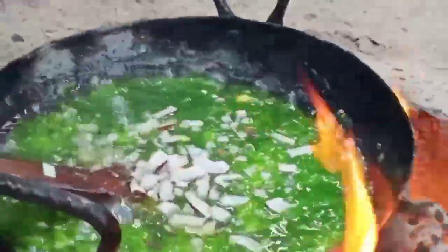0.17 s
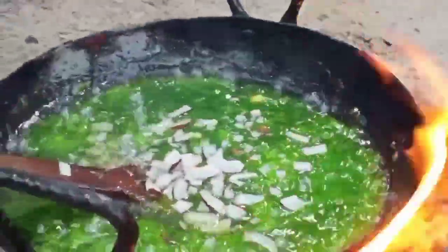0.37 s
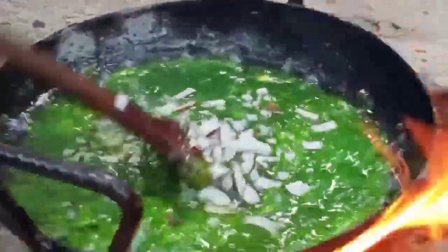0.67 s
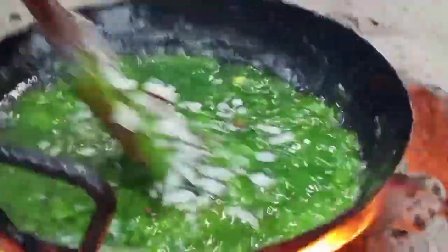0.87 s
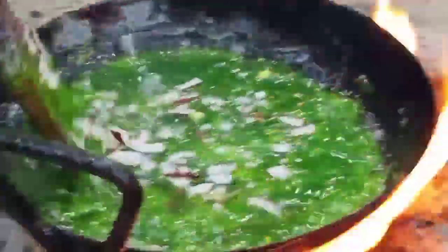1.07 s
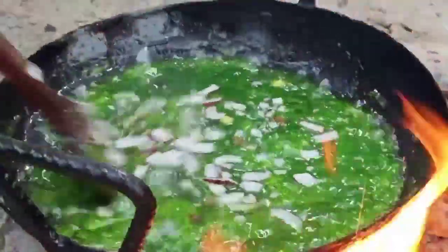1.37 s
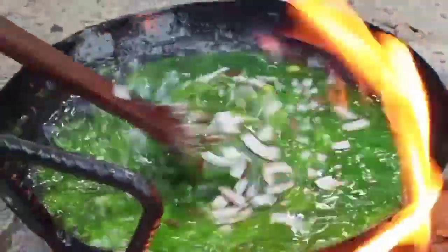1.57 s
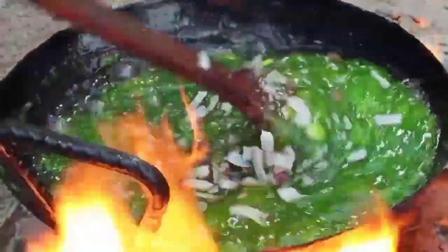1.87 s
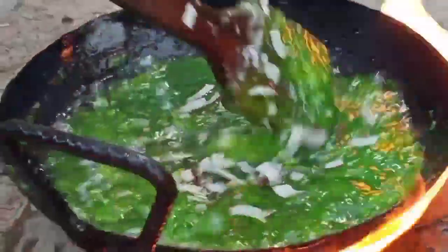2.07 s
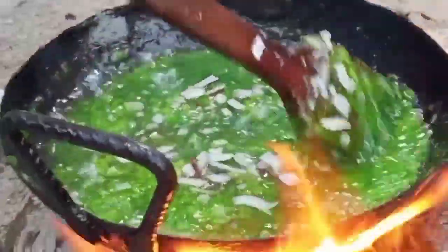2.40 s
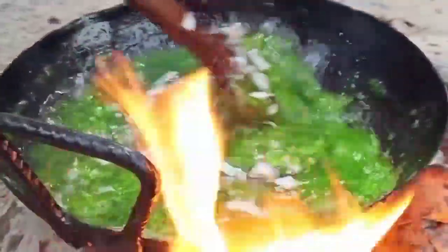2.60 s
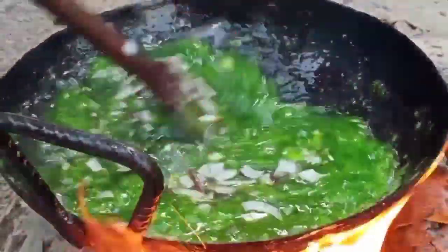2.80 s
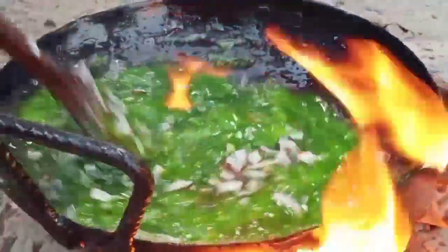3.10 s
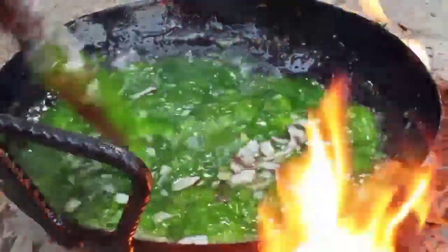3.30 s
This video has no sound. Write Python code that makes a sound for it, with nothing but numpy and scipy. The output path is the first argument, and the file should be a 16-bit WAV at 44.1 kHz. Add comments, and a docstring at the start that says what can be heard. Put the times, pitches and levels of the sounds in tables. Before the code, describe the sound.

Thick mixture sizzles and pops in an iron pan over a fluttering wood fire while a spatula scrapes

```python
"""A thick sweet mixture fries in an iron pan over an open wood fire, heard from close by outdoors.
From the start flames roar and flutter (shaped noise and grains) under a simmer of dense ticks that surges.
Bubbles soon pop as short upward chirps; from 0.8 s a wooden spatula scrapes, and droplets spit noise bursts.
Steam hisses at 1.5 s as the mass is turned; from 2.2 s a small distant bird whistles rising, echoing sines.
The fire's roar slowly grows throughout, while the simmer sinks near the end."""
import sys
import numpy as np
from scipy import signal
from scipy.fft import rfft, irfft
from scipy.io import wavfile
from scipy.ndimage import uniform_filter1d

SR = 44100
rng = np.random.default_rng(int(sys.argv[2]) if len(sys.argv) > 2 else 0)


def output_pcm(signal):
    """Save a mono or channel-first signal as 16-bit PCM at the path in sys.argv[1].

    Samples are clipped to [-1, 1] before scaling.
    """
    pcm = np.clip(np.atleast_2d(signal).T, -1, 1) * 32767
    wavfile.write(sys.argv[1], SR, np.round(pcm).astype(np.int16))


N = 152145


def undb(db):
    """Decibels to gain."""
    return 10 ** (np.asarray(db) / 20)


def unit(x):
    """Scale to rms 1."""
    return x / np.sqrt(np.mean(x ** 2))


def noise(count=N):
    """White noise of rms near 1."""
    return rng.standard_normal(count)


def band(x, low_hz, high_hz):
    """Band-pass between two corner frequencies."""
    return signal.sosfilt(signal.butter(2, [low_hz, high_hz], "band", fs=SR, output="sos"), x)


def whistle(pitch):
    """A sine that follows a pitch in Hz, sample by sample."""
    return np.sin(2 * np.pi * np.cumsum(pitch) / SR)


def curve(rows):
    """Gain along (s, dB) points."""
    return undb(np.interp(np.arange(N) / SR, *np.array(rows).T))


def walk(rate):
    """Smooth, bounded random motion with a spread near 1; rate is new values per second."""
    k = int(SR / rate)
    steps = np.repeat(noise(N // k + 1), k)[:N]
    smooth = uniform_filter1d(uniform_filter1d(steps, k), k)
    return 2 * np.tanh(smooth * np.sqrt(.5))


def colour(x, points):
    """Causal minimum-phase filter through (Hz, dB) points."""
    size = 4096
    hz, db = np.array(points).T
    bins_hz = np.arange(size // 2 + 1) * SR / size
    gain = undb(np.interp(np.log(bins_hz + 1), np.log(hz), db))
    # folding the cepstrum onto positive time makes the filter minimum-phase
    cepstrum = irfft(np.log(gain))
    cepstrum[1:size // 2] *= 2
    cepstrum[size // 2 + 1:] = 0
    return signal.fftconvolve(x, irfft(np.exp(rfft(cepstrum))))[:N]


def add(out, start_s, sound):
    """Mix a short sound in at a time."""
    i = int(start_s * SR)
    if 0 <= i < N:
        out[i:i + len(sound)] += sound[:N - i]


def echoes(x, t60):
    """Diffuse reflections: decaying noise of unit energy that starts after 2 ms."""
    t = np.arange(SR // 3) / SR
    tail = noise(len(t)) * np.exp(-np.log(1000) * t / t60) * (t > .002)
    return signal.fftconvolve(x, tail / np.linalg.norm(tail))[:N]


ATTACK_S, RELEASE_S = 0.0063, 0.0071


def swells(rows):
    """Attack, hold and release for each (s, length s, dB) row, summed in power."""
    t = np.arange(N) / SR
    power = np.zeros(N)
    for s, hold, db in rows:
        attack = np.clip((t - s) / ATTACK_S + .5, 0, 1)
        release = np.exp(-np.maximum(t - s - hold, 0) / RELEASE_S)
        power += (undb(db) * attack * release) ** 2
    return np.sqrt(power)


GRAIN_HZ = 2527  # pitch at which the tick rates hold; higher ticks are more frequent


def crackle(per_s, spread_db, points):
    """Dense ticks of a cycle or two and uneven size, octave by octave, in a given colour; rms 1."""
    out = np.zeros(N)
    for hz in SR / 2.5 / 2 ** np.arange(8):
        hit = rng.random(N) < per_s / SR * max(hz / GRAIN_HZ, .5)
        sizes = undb(spread_db * np.clip(noise(), -2.5, 2.5))
        signs = rng.choice([-1, 1], N)
        out += band(unit(hit * sizes * signs), hz / 2, hz)
    return unit(colour(out, points))


# bird notes, each an upward slur: t/s, rise length/s, start f/Hz, end f/Hz, level/dB before the yard mix
BIRD_NOTES = [(2.201, 0.028, 5200, 6880, -38.5), (2.292, 0.025, 5100, 6560, -39),
              (2.394, 0.031, 4800, 6120, -38.5), (2.499, 0.093, 5170, 6610, -41),
              (2.677, 0.1, 5130, 6710, -42.5), (2.893, 0.077, 5630, 7100, -39),
              (3.095, 0.083, 5630, 6940, -43.5), (3.245, 0.13, 3734, 6710, -44.5)]
BIRD_HOLD_SHARE, BIRD_FADE_S = 0.38, 0.016  # hold after the rise, as a share of the rise time
BIRD_RASP = .04  # pitch spread during the rise, share of the pitch
BIRD_DIRECT_DB, BIRD_ECHO_DB, YARD_T60_S = 0.5, 7, 0.11


def bird():
    """A run of whistles that rise with a rasp and level off cleanly on top, smeared by the yard."""
    out, t = np.zeros(N), np.arange(SR // 5) / SR
    for s, length, from_hz, to_hz, db in BIRD_NOTES:
        rasp = BIRD_RASP * walk(900)[:len(t)] * (t < length)
        pitch = np.interp(t, [0, length], [from_hz, to_hz]) * (1 + rasp)
        time_left = length * (1 + BIRD_HOLD_SHARE) - t
        shape = np.clip(np.minimum(t, time_left) / BIRD_FADE_S, 0, 1)
        add(out, s, undb(db) * shape * whistle(pitch))
    return undb(BIRD_DIRECT_DB) * out + undb(BIRD_ECHO_DB) * echoes(out, YARD_T60_S)


# tone of the low roar: f/Hz, relative level/dB
ROAR_COLOUR = [(30, -17), (65, -18), (90, -5), (125, 0.5), (200, -7.5), (300, -15), (500, -8), (1000, -13),
               (3000, -31.5)]
# tone of the fluttering flames: f/Hz, relative level/dB
FLUTTER_COLOUR = [(60, -43.5), (140, 2), (250, 0.5), (320, -2.5), (390, 1.5), (480, -7.5), (800, -17.5),
                  (2000, -37)]
# flames licking round the pan: t/s, level/dB
FLARE_LEVEL = [(0, -58), (.26, -41), (.6, -42), (1.05, -41), (1.47, -48.5), (1.77, -43.5), (2.1, -53),
               (2.72, -45.5), (3.45, -56)]
ROAR_START_DB, ROAR_RISE_DB_PER_S, ROAR_FLICKER_DB = -47, 0.63, 4
PUFFS_PER_S, PUFF_SPREAD_DB = 240, 3


def fire():
    """A low roar that slowly grows, and the flutter of flames that lick round the pan in uneven puffs."""
    roar_db = ROAR_START_DB + ROAR_RISE_DB_PER_S * np.arange(N) / SR
    roar_db = roar_db + ROAR_FLICKER_DB * walk(44.66)
    roar = unit(colour(noise(), ROAR_COLOUR)) * undb(roar_db)
    flutter = crackle(PUFFS_PER_S, PUFF_SPREAD_DB, FLUTTER_COLOUR) * curve(FLARE_LEVEL)
    return roar + flutter


# the spatula drags over the pan: t/s, length/s, level/dB before flicker
SCRAPE_STROKES = [(.80, 0.024, -36.5), (1.075, 0.032, -35.5), (1.515, 0.19, -29.5), (1.715, 0.16, -33),
                  (1.85, 0.075, -36.5), (1.95, 0.35, -38), (2.46, 0.083, -41), (2.59, 0.246, -42.5),
                  (2.845, 0.053, -33.5), (2.90, 0.24, -40.5), (3.23, 0.52, -46)]
# tone of wood on damped iron: f/Hz, relative level/dB
SCRAPE_COLOUR = [(90, -7), (250, -6.5), (500, 0.5), (900, 3), (1200, -4), (1620, 6.5), (2000, -1),
                 (2400, 3.5), (3200, -3.5), (5000, -7.5), (9000, -11.5)]
# the heavy mass flops back into the pan: t/s, length/s, level/dB
MASS_THUDS = [(.822, 0.017, -33), (1.64, 0.015, -42)]
SCRAPE_PER_S, SCRAPE_SPREAD_DB, SCRAPE_FLICKER_DB = 700, 4.5, 3.5
THUD_HZ = 435  # upper edge of the thud


def spatula():
    """Wood sticks and slips on iron that the mixture damps; the lifted mass lands with a dull thud."""
    grains = crackle(SCRAPE_PER_S, SCRAPE_SPREAD_DB, SCRAPE_COLOUR)
    scrape = grains * swells(SCRAPE_STROKES) * undb(SCRAPE_FLICKER_DB * walk(80))
    dull = band(noise(), THUD_HZ / 4, THUD_HZ)
    return scrape + unit(dull) * swells(MASS_THUDS)


# droplets that spit in the oil: t/s at the peak, level/dB before gain and colour
SPIT_HITS = [(0.9723, -17), (1.199, -20.5), (1.357, -30), (1.957, -28)]
# steam escapes as the spatula turns the mass over: t/s, length/s, level/dB before colour
STEAM_PUFFS = [(1.512, 0.13, -36), (1.728, .05, -34)]
# tone of spits and steam: f/Hz, gain level/dB
SPIT_TONE = [(200, 1), (2000, -9), (5000, 9), (15000, 8)]
SPIT_DECAY_S, SPIT_GAIN_DB = 0.001291, 1.98
TICK_PER_S, TICK_DB, TICK_SPREAD_DB = 30, -42, 3.5  # the finest droplets, before gain and colour


def spits():
    """Droplets flash to steam with a short crack, the finest at random; freed steam hisses in that colour."""
    out = np.zeros(N)
    u = np.arange(SR // 60) / SR / SPIT_DECAY_S
    shape = u * np.exp(1 - u)  # peaks one decay time in
    ticks = [(rng.random() * N / SR, TICK_DB + TICK_SPREAD_DB * rng.standard_normal())
             for _ in range(int(TICK_PER_S * N / SR))]
    for s, db in SPIT_HITS + ticks:
        add(out, s - SPIT_DECAY_S, undb(db + SPIT_GAIN_DB) * noise(len(u)) * shape)
    steam = swells(STEAM_PUFFS) * noise()
    return colour(out + steam, SPIT_TONE)


POP_RISE, POP_FALL, POP_GLIDE = 0.7, 1, 0.1102  # in pop lengths; octaves up per pop length
POP_CRACK_DB = -7.48  # noise before its band-pass, against the chirp


def pop(hz, ms):
    """A bubble opens: a few cycles rising in pitch, roughened by the tearing skin; it peaks 10 ms in."""
    u = (np.arange(SR // 30) - SR // 100) / SR * 1000 / ms  # time from the peak, in pop lengths
    shape = np.exp(-(u / np.where(u < 0, POP_RISE, POP_FALL)) ** 2)
    pitch = hz * 2 ** (POP_GLIDE * np.clip(u - .5, -2, 2))
    tear = band(noise(len(u)), 900, 5000)
    return shape * (whistle(pitch) + undb(POP_CRACK_DB) * tear)


# bubbles that burst, from high pops to low glugs:
# t/s at the peak, level/dB before the shared trim, f/Hz, length/ms
BIG_POPS = [(.168, -25.5, 3420, 2.3), (0.358, -25, 3910, 1.6), (0.4937, -13, 3240, 1.4),
            (.514, -29, 2730, 1.2), (.561, -26, 3270, 2.7), (0.764, -23, 3780, 1.4),
            (0.8696, -7.5, 3570, 0.81), (.8933, -20.5, 3810, 1.4), (0.94, -23, 3500, 3),
            (1.1666, -12.5, 3700, 0.48), (1.1895, -14, 1900, 0.94), (1.194, -20, 3410, 0.79),
            (1.1993, -18, 4330, 0.66), (1.2036, -13, 4080, 0.4), (1.277, -22, 2600, 4.7),
            (1.2937, -12, 2910, .4), (1.3044, -14.5, 3750, 0.35), (1.3115, -2.5, 4070, 1.24),
            (1.3108, -12.5, 2845, 0.53), (1.317, -20, 3160, 1), (1.3658, -18, 1930, 1.05),
            (1.4515, -18.5, 3010, 0.66), (1.6478, -11, 1957, 0.75), (1.6577, -7, 2276, 0.24),
            (1.675, -21, 1650, 2.9), (1.717, -27, 903, 6.7), (1.753, -17.5, 2780, 1.2),
            (1.856, -17.5, 2705, 5.1), (1.8667, -5.5, 3350, 0.78), (1.878, -6, 3225, 0.27),
            (1.899, -20.5, 3610, 2), (1.949, -13.5, 2970, 0.82), (2.1006, -25.5, 2220, 3.5),
            (2.1735, -21, 1880, 2.7), (2.2345, -3.5, 3436, 0.084), (2.2796, -20, 1742, 3.2),
            (2.362, -20.5, 2160, 1.2), (2.4598, -20.5, 3700, 1.4), (2.5151, -13.5, 1720, 1.9),
            (2.5356, -19.5, 268, 1.6), (2.598, -24, 3320, 1.6), (2.608, -24.5, 2430, 4.3),
            (2.72, -30, 270, 3.8), (2.7841, -12.5, 3435, 0.49), (2.7942, -14, 3100, 0.64),
            (2.8821, -24.5, 2470, 2.5), (3.032, -29.5, 494, 7.4), (3.0677, -15.5, 3330, 0.38),
            (3.128, -26, 3250, 2.1), (3.246, -24, 1633, 1.5)]
POP_TRIM_DB = -3
# small pops: middle values before random spread; the level is also before surge lift and trim
SMALL_PER_S, SMALL_DB, SMALL_HZ, SMALL_MS = 140, -32, 3008, 1.1
SMALL_SPREAD_DB, SMALL_SPREAD_OCTAVES = 3.3, .52
SMALL_SURGE_DB = -35  # surge level at which the small pops double in power


def bubbles():
    """The big pops, and small ones scattered at random among them that sputter harder in a surge."""
    out = np.zeros(N)
    lift_db = 10 * np.log10(1 + (swells(SIZZLE_SURGES) / undb(SMALL_SURGE_DB)) ** 2)
    small = []
    for _ in range(int(SMALL_PER_S * N / SR)):
        i = int(rng.random() * N)
        a, b, c = np.clip(noise(3), -2, 2)
        db = SMALL_DB + SMALL_SPREAD_DB * a + lift_db[i]
        small.append((i / SR, db, SMALL_HZ * 2 ** (SMALL_SPREAD_OCTAVES * b), SMALL_MS * 2 ** c))
    for s, db, hz, ms in BIG_POPS + small:
        add(out, s - .01, undb(db + POP_TRIM_DB) * pop(hz, ms))
    return out


# wet mixture meets hot iron and the sizzle surges: t/s, length/s, level/dB
SIZZLE_SURGES = [(.038, 0.01, -35.5), (.385, 0.012, -30), (.727, 0.031, -32.5), (.795, 0.06, -31.5),
                 (1.35, 0.03, -38), (1.435, 0.012, -35), (1.497, 0.037, -30), (1.553, 0.042, -27),
                 (1.60, 0.33, -42.5), (1.73, 0.054, -35), (1.85, 0.029, -34.5), (1.945, 0.0073, -29.5),
                 (2.49, 0.065, -37), (2.905, 0.057, -34)]
# tone of the sizzle: f/Hz, relative level/dB
SIZZLE_COLOUR = [(200, -27.5), (500, -16.5), (900, -12), (1250, -9.5), (1700, -2), (2600, -6.5),
                 (4000, 2.5), (5500, -1.5), (15000, -5)]
# steady sizzle: t/s, level/dB before flicker
SIMMER_LEVEL = [(0, -40), (.7, -36.5), (1.0, -37), (1.25, -41), (2.0, -38.5), (2.8, -38.5), (3.2, -45.5),
                (3.45, -46.5)]
SIZZLE_PER_S, SIZZLE_SPREAD_DB, SIZZLE_FLICKER_DB = 800, 4.5, 2.6
SURGE_TOP_HZ = 5340  # gentle low-pass
FIZZ_DB, FIZZ_S = -14.5, 0.009  # spray against the pops, and its smoothing time


def sizzle(pops):
    """Countless tiny bursts in the oil: a bright simmer, duller surges, and the spray round each pop."""
    grains = crackle(SIZZLE_PER_S, SIZZLE_SPREAD_DB, SIZZLE_COLOUR)
    simmer = grains * curve(SIMMER_LEVEL) * undb(SIZZLE_FLICKER_DB * walk(90))
    k = int(FIZZ_S * SR)
    pop_power = uniform_filter1d(uniform_filter1d(pops ** 2, k), k // 2)
    spray = undb(FIZZ_DB) * np.sqrt(np.abs(pop_power))
    dull = signal.butter(1, SURGE_TOP_HZ, fs=SR, output="sos")
    wet = signal.sosfilt(dull, crackle(SIZZLE_PER_S, SIZZLE_SPREAD_DB, SIZZLE_COLOUR))
    return simmer + unit(wet) * np.hypot(spray, swells(SIZZLE_SURGES))


PAN_ECHO_S, PAN_ECHO_DB, TAIL_DB, TAIL_T60_S = 0.0037, -14, -8, 0.065


def scene():
    """Bursts with a reflection from the pan wall and a short tail, over sizzle, spatula, fire and bird."""
    pops = bubbles()
    bursts = pops + spits()
    wall = np.pad(bursts, (int(PAN_ECHO_S * SR), 0))[:N]
    pan = bursts + undb(PAN_ECHO_DB) * wall + undb(TAIL_DB) * echoes(bursts, TAIL_T60_S)
    return (bird() + fire() + spatula() + pan + sizzle(pops))[None]


# microphone response: f/Hz, gain level/dB
MIC_RESPONSE = [(30, -13), (70, 0.5), (4400, -0.5), (5400, -5.5), (6300, -18), (7400, -29), (10500, -32.5),
                (12600, -22.5), (14500, -35), (16000, -41)]
TOP_HZ = 15800


def record(dry):
    """A microphone that is dull above 5 kHz, then a steep top cut."""
    top_cut = signal.ellip(10, .2, 70, TOP_HZ, fs=SR, output="sos")
    return signal.sosfilt(top_cut, colour(dry[0], MIC_RESPONSE))[None]


dry = scene()
out = record(dry)
output_pcm(out)
```